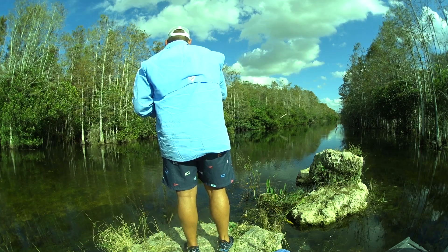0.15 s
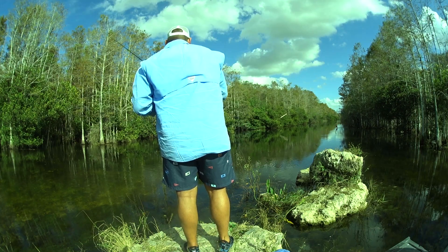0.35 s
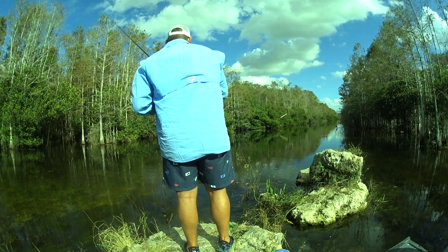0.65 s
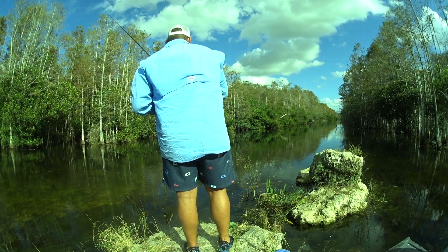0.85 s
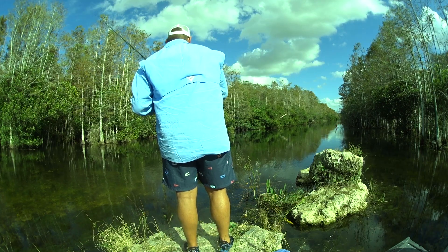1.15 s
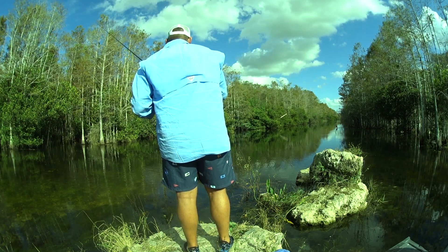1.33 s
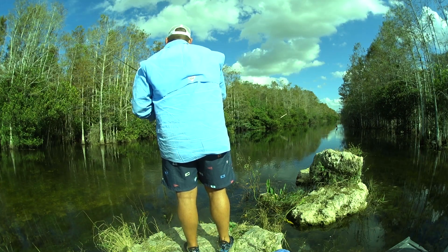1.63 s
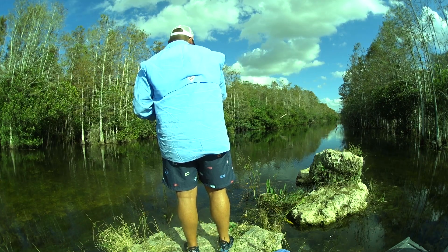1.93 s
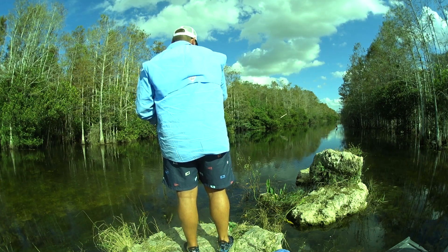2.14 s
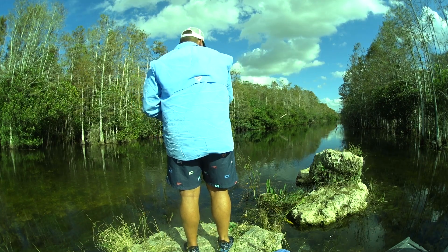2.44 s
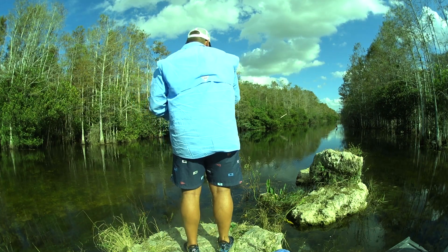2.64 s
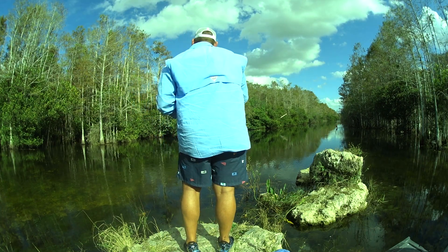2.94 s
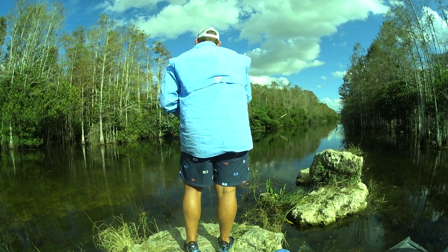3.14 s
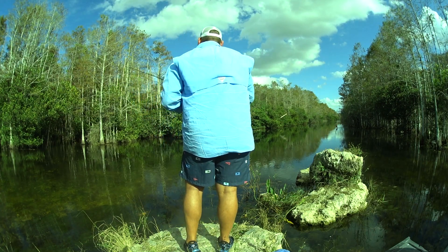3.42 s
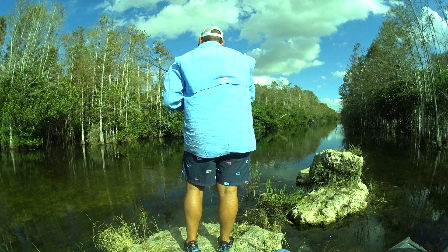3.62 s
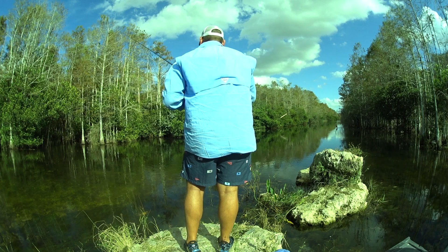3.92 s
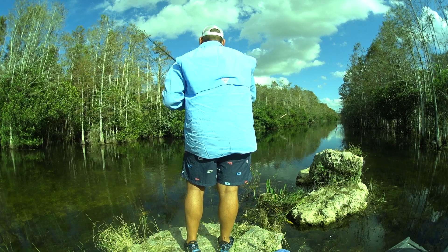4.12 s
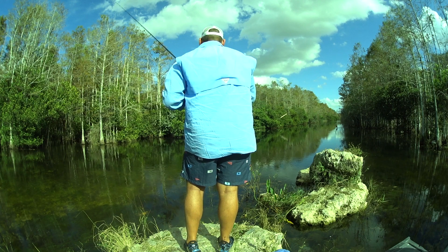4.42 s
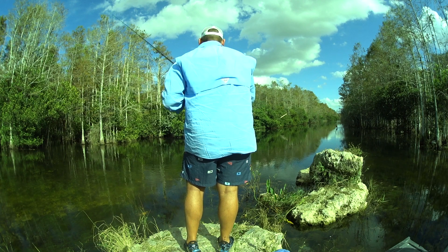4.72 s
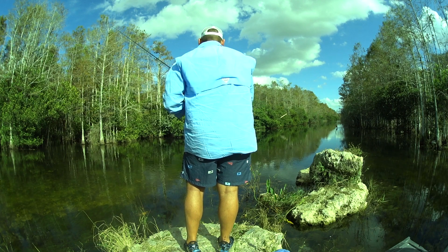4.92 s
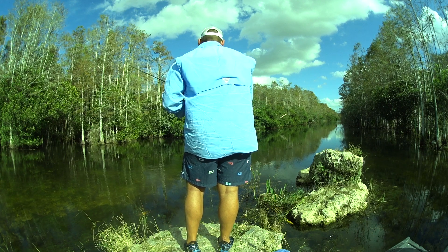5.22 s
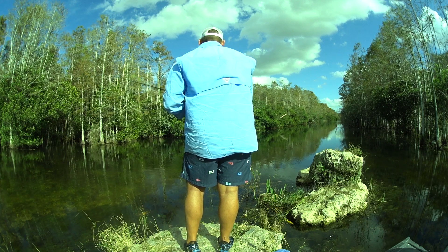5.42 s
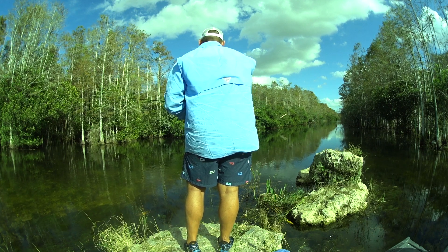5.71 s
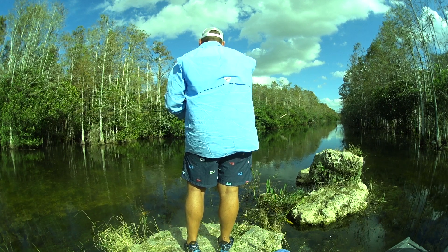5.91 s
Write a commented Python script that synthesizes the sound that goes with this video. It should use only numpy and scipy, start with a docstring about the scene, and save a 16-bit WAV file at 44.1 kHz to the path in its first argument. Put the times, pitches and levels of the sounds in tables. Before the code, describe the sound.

Fishing tackle ticks and scuffs briefly up close while a faraway airboat hums steadily, under a light breeze and small bird chips.

```python
"""Open wetland: a far airboat drones across the water, easing off as it moves away. Its exhaust radiates
harmonics of the engine cycle, which beat against each other under the blade tones and turbulent roar of the
propeller. A breeze buffets the microphone over an even hiss, and a small bird chips, its calls scattered by the
trees. Close by, a few sharp ticks (impact) sound and a foot scuffs on rock (friction)."""
import sys
import numpy as np
from scipy import signal
from scipy.fft import rfft, irfft
from scipy.io import wavfile
from scipy.ndimage import uniform_filter1d

SR = 44100
rng = np.random.default_rng(int(sys.argv[2]) if len(sys.argv) > 2 else 0)


def persist_wave(psi):
    """Save psi, clipped to +-1, as 16-bit WAV."""
    counts = np.round(np.clip(psi, -1, 1) * 32767).astype(np.int16)
    wavfile.write(sys.argv[1], SR, np.atleast_2d(counts).T)


N = 267246
TIME = np.arange(N) / SR
BINS = np.fft.rfftfreq(N, 1 / SR)


def gain_of(db):
    """Amplitude ratio of a level in decibels."""
    return 10 ** (np.asarray(db) / 20)


def unit_rms(x):
    """Normalisation to rms 1."""
    return x / np.sqrt(np.mean(x ** 2) + 1e-20)


def bell(x, centre, width):
    """Gaussian of height 1, falling to 1/e at one width from its centre."""
    return np.exp(-((x - centre) / width) ** 2)


def level_at(spectrum, hz):
    """Interpolation of a spectrum on a logarithmic frequency axis."""
    f, db = np.transpose(spectrum)
    return np.interp(np.log(hz + 1), np.log(f + 1), db)


def add(mix, start_s, sound):
    """Superposition of a sound on the mix."""
    part = mix[max(round(start_s * SR), 0):][:len(sound)]
    part += sound[:len(part)]


def noise(spectrum):
    """Spectral shaping: white noise filtered to a spectrum level (power in a 1 Hz band)."""
    white = rfft(rng.standard_normal(N))
    return irfft(white * gain_of(level_at(spectrum, BINS)), N) * np.sqrt(SR / 2)


def drift(rate_hz, points=2048):
    """Random fluctuation of rms 1: noise through a Gaussian low-pass of width rate_hz."""
    f = np.fft.rfftfreq(points, TIME[-1] / points)
    slow = irfft(rfft(rng.standard_normal(points)) * np.exp(-.5 * (f / rate_hz) ** 2))
    return np.interp(TIME, np.linspace(0, TIME[-1], points), unit_rms(slow))


def fading_tone(cycles, scatter, rate_hz):
    """Multipath fading: a steady direct tone plus a share of the power arriving by shifting paths."""
    phase = 2 * np.pi * (cycles + rng.random())
    in_phase = np.sqrt(2 * (1 - scatter)) + np.sqrt(scatter) * drift(rate_hz)
    quadrature = np.sqrt(scatter) * drift(rate_hz)
    return in_phase * np.cos(phase) + quadrature * np.sin(phase)


# Engine cycle rate as the throttle eases, holds and eases again: t/s, f/Hz
ENGINE_SPEED = [(0, 11.46), (.25, 11.13), (.75, 10.76), (1.25, 10.28), (1.65, 10.03), (2.25, 10.03),
                (2.5, 9.98), (3.2, 9.98), (3.75, 9.61), (4.55, 9.09), (5.5, 8.89), (5.75, 9.01), (6.06, 9)]


def engine():
    """Phase is the integral of frequency: returns the cycle rate in Hz and the cycles completed."""
    speed = np.interp(TIME, *np.transpose(ENGINE_SPEED))
    return speed, np.cumsum(speed) / SR


# Strong harmonics, each swelling around one cycle rate: order, base level/dB, swell/dB, f/Hz, width/Hz
STRONG_ORDERS = [(6, -53.5, 13.8, 10.75, 1.9), (9, -50, 11, 9.23, .6), (10, -45.5, 8, 9.15, .3),
                 (12, -58, 28.8, 9.8, 1.45), (16, -57, 15, 10.4, 1), (18, -68.5, 33, 10.75, 2.15),
                 (21, -55, 15, 9.15, .8)]
# Gain of the strong harmonics as they carry over the water: t/s, level/dB
CARRY_GAIN = [(0, 2.5), (.5, 2.5), (1.15, -2.7), (1.55, -1.1), (2.5, -.3), (3.3, -.8), (4.1, -2.5),
              (5.2, -.4), (6.06, 1.2)]
# Weak harmonics from uneven cylinders: order, level/dB
WEAK_ORDERS = [(7, -61), (8, -52), (11, -58), (13, -54), (14, -51), (15, -52), (17, -57), (19, -55),
               (20, -50), (22, -60), (23, -65), (24, -60)]
# Exhaust scattered by the trees: f/Hz, spectrum level/dB
RUMBLE = [(15, -85), (40, -79), (55, -73), (75, -71), (100, -59), (118, -62), (142, -73), (170, -67),
          (205, -62), (228, -68), (255, -82), (320, -98), (600, -130)]


def exhaust(speed, cycles):
    """Periodic firing radiates a harmonic series; neighbouring orders beat into a throb."""
    carry_db = np.interp(TIME, *np.transpose(CARRY_GAIN))
    surge_db = 8.7 * bell(TIME, 3.34, .24)  # the bass near 85 Hz swells briefly
    strong = np.zeros(N)
    for order, base_db, swell_db, peak_hz, width_hz in STRONG_ORDERS:
        db = base_db + swell_db * bell(speed, peak_hz, width_hz)
        db += surge_db * bell(order * speed, 85, 23)
        strong += gain_of(db + carry_db) * fading_tone(order * cycles, scatter=.001, rate_hz=3)
    weak = sum(gain_of(db) * fading_tone(order * cycles, scatter=.15, rate_hz=.7)
               for order, db in WEAK_ORDERS)
    cruising = bell(speed, 10.05, .36)  # the cylinders fire most evenly at cruising speed
    unevenness = gain_of(-.33 - 1.5 * cruising)
    return strong + unevenness * (weak + noise(RUMBLE))


# Response of the path, which favours some pitches as the blade tones glide: f/Hz, level/dB
PATH_RESPONSE = [(270, -63.5), (330, -55), (400, -65), (440, -57), (500, -66), (550, -60), (610, -60),
                 (675, -58.5), (725, -57.5), (790, -59), (880, -58.5), (950, -70), (1150, -64.5),
                 (1550, -69.5)]


def blades(speed, cycles, passes_per_cycle=10):
    """Harmonics of the blade-passing frequency; moving air broadens the higher ones more."""
    tones = np.zeros(N)
    for harmonic in range(3, 16):
        order = harmonic * passes_per_cycle
        tone = fading_tone(order * cycles, scatter=.96, rate_hz=2.6 * harmonic)
        tones += gain_of(level_at(PATH_RESPONSE, order * speed)) * tone
    swell_db = -9 + 10.5 * bell(TIME, 1.4, 1.15)
    return gain_of(swell_db) * tones


# Propeller wash, near and far: f/Hz, spectrum level/dB
ROAR_NEAR = [(150, -86), (250, -83), (320, -72.5), (430, -79), (540, -82.5), (800, -75.5), (1050, -77),
             (1350, -79.5), (1580, -74.5), (1900, -89), (2500, -94), (3500, -104), (5000, -113),
             (8000, -135)]
ROAR_FAR = [(150, -80.5), (280, -87), (400, -88.5), (550, -88.5), (750, -91.5), (1000, -93), (1500, -98),
            (2000, -100), (3000, -108), (5000, -120), (8000, -140)]


def roar(leaves_s=.78, recede_s=2.34, patchy_db=2.07, gain_db=.46):
    """Turbulence in the propeller wash radiates broadband noise, which dulls with distance."""
    hz, t, white = signal.stft(rng.standard_normal(N), SR, nperseg=1024, noverlap=768)
    nearness = .78 * np.exp(-np.maximum(t - leaves_s, 0) / recede_s)
    near_db, far_db = level_at(ROAR_NEAR, hz)[:, None], level_at(ROAR_FAR, hz)[:, None]
    field_db = near_db * nearness + far_db * (1 - nearness)
    # moving air lets narrow bands swell and fade
    patches = uniform_filter1d(rng.standard_normal(white.shape), size=2, axis=0)
    patches = unit_rms(uniform_filter1d(patches, size=40, axis=1))
    _, wash = signal.istft(white * gain_of(field_db + patchy_db * patches), nperseg=1024, noverlap=768)
    return gain_of(gain_db) * wash[:N] * np.sqrt(SR / 2)


# Air on the microphone: f/Hz, spectrum level/dB
BREEZE = [(10, -68.5), (25, -69), (42, -63), (60, -73.5), (100, -78), (300, -130)]
# Puffs of air: t/s, relative level/dB, half-width/s
GUSTS = [(.02, 7.5, .05), (0.277, 7, 0.1), (1.943, 3.5, .13), (2.247, 6.5, .17), (2.85, 2, 0.061)]


def breeze(calm_db=-8.5):
    """Wind noise: low buffeting in which the steady flow and the puffs add in power."""
    gust_power = sum((gain_of(db) * bell(TIME, peak_s, half_s)) ** 2 for peak_s, db, half_s in GUSTS)
    return noise(BREEZE) * np.sqrt(gain_of(calm_db) ** 2 + gust_power)


# Even hiss, and hiss that differs between the microphone ports: f/Hz, spectrum level/dB
HISS = [(500, -115), (2000, -106), (4000, -106), (5500, -109), (6700, -113), (7400, -118), (8400, -117),
        (9200, -113), (9900, -112), (10300, -118), (11000, -116)]
SIDE_HISS = [(200, -91), (800, -96), (2000, -100), (3000, -104), (5000, -110), (6500, -117), (8000, -124),
             (11000, -126)]


def hiss():
    """Stationary noise in stereo: one part picked up by the pair, another in antiphase."""
    return microphone_pair(noise(HISS)) + noise(SIDE_HISS) * np.array([[1], [-1]])


# Bird chips: t/s, f/Hz, level/dB, hold/s, rasp (rms fraction of f)
CHIPS = [(.001, 6540, -68.5, .011, .028), (1.192, 6760, -65, .014, 0.03), (2.254, 6400, -63.5, 0.013, .032),
         (3.551, 6140, -62.5, .012, 0.035), (4.466, 6560, -67, .017, 0.037),
         (5.754, 5950, -59, 0.011, 0.076)]


def bird(fall=.3, flick_s=.0072, flick_db=-9):
    """Frequency modulation: each chip rasps about its pitch, then flicks downward as it dies."""
    chips = np.zeros(N)
    for start_s, hz, db, hold_s, rasp in CHIPS:
        t = np.arange(int((hold_s + flick_s) * SR)) / SR
        flick = np.maximum(t - hold_s, 0) / flick_s
        waver = unit_rms(uniform_filter1d(rng.standard_normal(4096), size=24))[:len(t)]
        pitch = hz * (1 + rasp * waver - fall * flick)
        envelope = signal.windows.tukey(len(t), .3) * gain_of(flick_db * flick)
        chip = envelope * np.sin(2 * np.pi * np.cumsum(pitch) / SR)
        add(chips, start_s, gain_of(db) * unit_rms(chip))
    return chips


def trees(sound, flurry_s=.018, t60_s=.75, bank_s=.088, wet_db=3):
    """Reverberation: near trunks scatter a quick flurry; the far bank returns a swell and a thin tail."""
    t = np.arange(SR // 2) / SR
    tail_db = -60 * t / t60_s + 5 * bell(t, bank_s, .04)
    flurry = 1 + 1.4 * np.exp(-t / flurry_s)
    response = rng.standard_normal(len(t)) * gain_of(tail_db) * flurry
    return gain_of(wet_db) * signal.fftconvolve(sound, response / np.linalg.norm(response))[:N]


# Close ticks: t/s, initial level/dB, centre f/Hz, decay time/s
TICKS = [(1.137, -55, 5200, 0.0021), (1.145, -60.5, 4830, 0.0026), (1.451, -55, 8550, 0.0013),
         (2.087, -51.5, 2320, 0.0024), (2.228, -44.5, 3950, 0.004), (2.385, -62, 8500, .003),
         (2.559, -55.5, 4060, 0.0032), (3.054, -62, 8600, .001), (4.807, -55, 3100, 0.0031)]


def near_ticks(width_octaves=.36, samples=2048):
    """Damped impacts: each tick is a band of noise that decays exponentially."""
    ticks = np.zeros(N)
    t, f = np.arange(samples) / SR, np.fft.rfftfreq(samples, 1 / SR)
    for start_s, db, hz, decay_s in TICKS:
        band = np.exp(-.5 * (np.log2((f + 1) / hz) / width_octaves) ** 2)
        burst = unit_rms(irfft(rfft(rng.standard_normal(samples)) * band))
        add(ticks, start_s, gain_of(db) * burst * np.exp(-t / decay_s))
    return ticks


# A sharp scuff and the softer rubs after it: t/s, relative level/dB, rise time/s, decay time/s
SCUFFS = [(2.072, 1, 0.025, 0.039), (2.1, -6.5, .05, 0.3), (2.35, -14.5, .17, 0.2)]
# Foot scraping on rock: f/Hz, spectrum level/dB
SCUFF_SPECTRUM = [(100, -92), (400, -76.5), (1100, -77.5), (1700, -84.5), (2300, -83), (3200, -89.5),
                  (4800, -89.5), (6500, -101), (9000, -104), (11000, -107)]


def foot_scuff(grain_db=2):
    """Friction noise: gritty rubs build, die away and add in power."""
    grit = unit_rms(gain_of(grain_db * drift(rate_hz=90)))
    power = np.zeros(N)
    for start_s, db, rise_s, decay_s in SCUFFS:
        age = TIME - start_s
        envelope = np.clip(age / rise_s, 0, 1) * np.exp(-np.maximum(age - rise_s, 0) / decay_s)
        power += (gain_of(db) * envelope) ** 2
    return noise(SCUFF_SPECTRUM) * grit * np.sqrt(power)


# Width of the microphone pair: f/Hz, level of side relative to mid/dB
STEREO_WIDTH = [(20, -12.5), (60, -11), (120, -5.5), (200, -1), (300, 1), (500, 5), (1000, 7.5),
                (1600, 5.5), (2500, 2), (4000, -3.5), (6500, -7.5), (8000, -12.5), (11000, -10.5)]


def microphone_pair(mid):
    """Pressure gradient: the difference of two close ports leads by 90 degrees for sound from the left."""
    side = irfft(1j * rfft(mid) * gain_of(level_at(STEREO_WIDTH, BINS)), N)
    return np.array([mid + side, mid - side])


def scene():
    """Superposition of boat, bird, nearby ticks and scuff, and breeze over an even hiss."""
    speed, cycles = engine()
    boat = exhaust(speed, cycles) + blades(speed, cycles) + roar()
    chips = bird()
    bird_in_trees = chips + trees(chips)
    nearby = foot_scuff() + near_ticks()
    return microphone_pair(boat + bird_in_trees + nearby + breeze()) + hiss()


def record(dry, cutoff_hz=11050):
    """Band limiting by a linear-phase low-pass filter."""
    low_pass = signal.firwin(1023, cutoff_hz, window=("kaiser", 9), fs=SR)
    return signal.oaconvolve(dry, low_pass[None], "same")


dry = scene()
out = record(dry)
persist_wave(out)
```